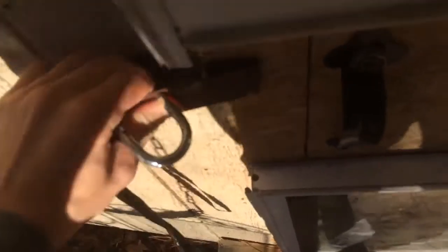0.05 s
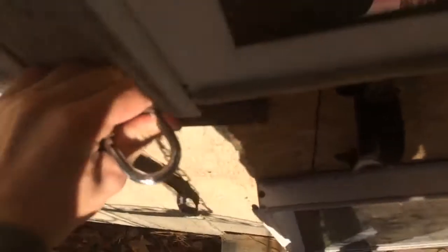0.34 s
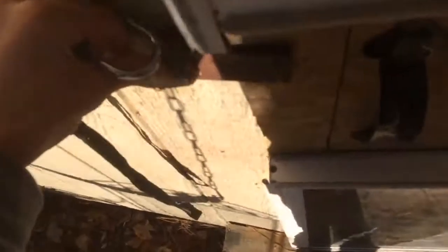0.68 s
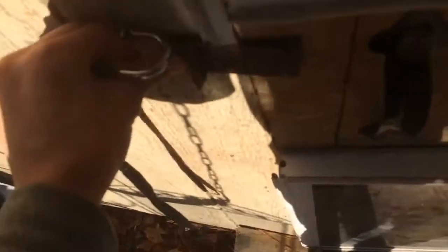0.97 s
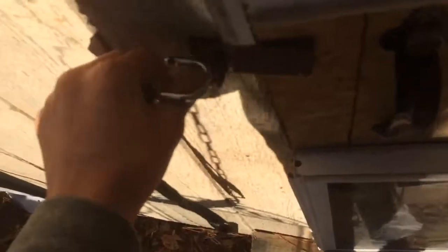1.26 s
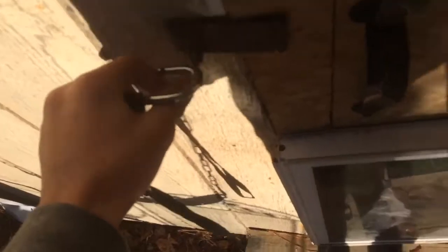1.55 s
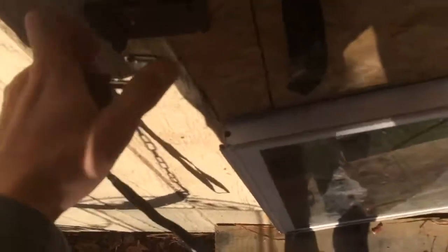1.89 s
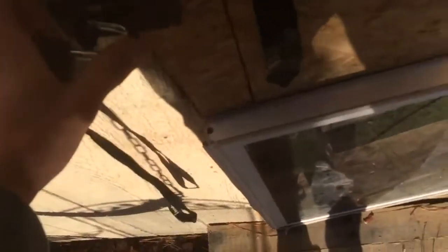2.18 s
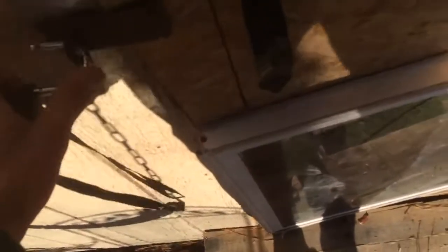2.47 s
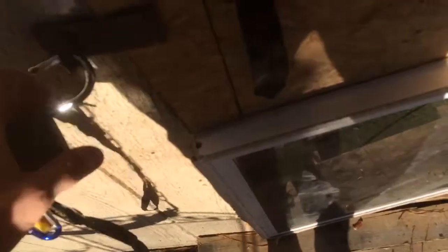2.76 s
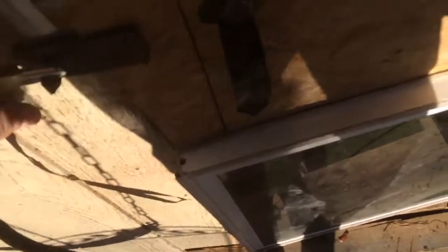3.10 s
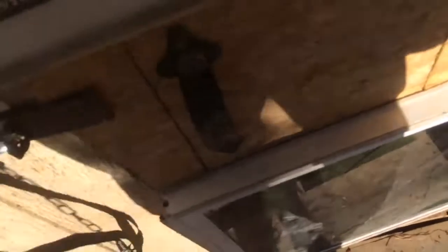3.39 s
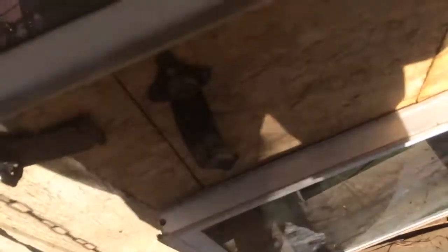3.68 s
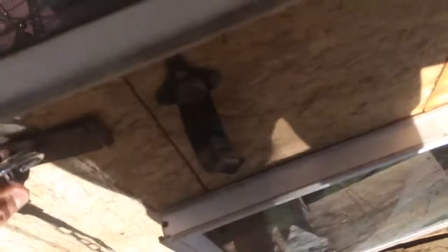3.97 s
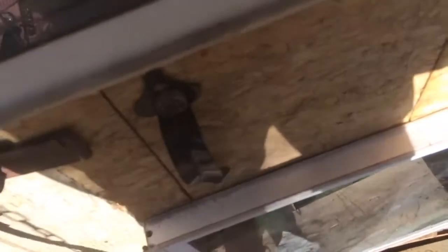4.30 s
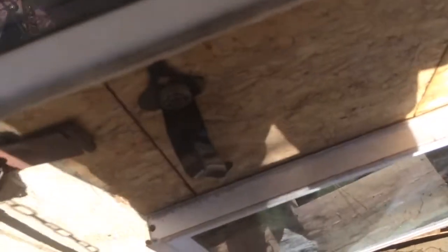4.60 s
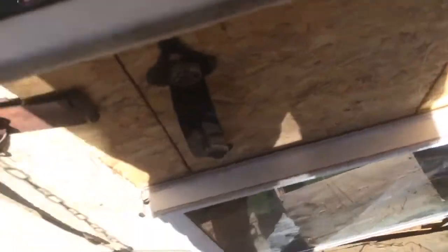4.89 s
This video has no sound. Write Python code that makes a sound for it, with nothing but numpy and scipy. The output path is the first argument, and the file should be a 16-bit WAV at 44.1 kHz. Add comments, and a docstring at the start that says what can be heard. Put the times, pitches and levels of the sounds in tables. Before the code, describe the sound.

A metal padlock scrapes, clacks and snaps shut on a wooden door's hasp, then keys jingle, with faint traffic outdoors.

```python
"""Outdoors at a wooden shed door, close by: a padlock with a bunch of keys in it is worked onto the hasp.
Far traffic hums, a machine whines and an insect trills faintly. The steel hasp scrapes in tiny slips
and knocks on the boards, which answer with a thud, and the shackle snaps home. As the keys are
turned and drawn out they swing, tick against each other and ring on.
A soft low handling bump and a rustle come at the end."""
import sys
import numpy as np
from scipy import signal
from scipy.fft import rfft, irfft
from scipy.io import wavfile

SR = 44100
rng = np.random.default_rng(int(sys.argv[2]) if len(sys.argv) > 2 else 0)


def bounce(signal):
    """Save signal as a 16-bit WAV file at the path given by the first command-line argument."""
    frames = np.transpose(np.atleast_2d(signal))
    limited = np.clip(frames, -1, 1)
    pcm = np.round(limited * 32767).astype(np.int16)
    wavfile.write(sys.argv[1], SR, pcm)


N = 222492
TIME = np.arange(N) / SR
HIT_TIME = TIME[:SR // 6]  # time axis of a one-shot

# Table levels are ahead of each layer's own gains.
# tone curves of the traffic's rumble and tyre noise: f/Hz, level/dB
RUMBLE_EQ = [(15, -39.5), (28, -28), (55, -4.5), (125, -5), (165, -7.5), (200, -12), (280, -17),
             (550, -28.5), (1200, -68), (4000, -73)]
TYRE_EQ = [(200, 0), (650, 0.5), (950, 4), (1500, 2), (2000, -5), (2600, -13.5), (4000, -25.5), (7000, -24),
           (15000, -28)]
# ebb and flow of traffic, which the tyre noise partly follows: t/s, level/dB
TRAFFIC_FLOW = [(0.0, -43.5), (0.46, -54), (2.06, -49), (2.28, -42), (3.64, -51.5), (5.05, -56)]
# tones of far engines: f/Hz, level/dB
ENGINE_TONES = [(86.1, -46.5), (328.4, -61), (737.5, -65), (888.2, -63), (1410, -74.5), (1642, -72)]
# fader ride of the insect: t/s, level/dB
INSECT_RIDE = [(0, -60), (2.0, -57.5), (3.7, -60), (4.4, -59.5), (4.9, -60.5)]
# modes of the door boards: f/Hz, level/dB, t60/s
DOOR_MODES = [(91.2, -4, 0.18), (138.6, 3, 0.14), (165.9, 1, 0.18), (220, -24, 0.033), (256.2, -6, 0.15),
              (321.7, -13.5, 0.11), (432.3, -7.5, 0.23), (680, -18.5, 0.0077)]
# resonances of lock and hasp, and of the keys: f/Hz, width/Hz, level/dB
LOCK_MODES = [(676, 12, 2.5), (1110, 20, -3), (1458, 200, -9), (1898, 25, -14), (2144, 13, -16),
              (3010, 87, -11.5), (5025, 220, -12.5), (5670, 62, -31), (6590, 40, -16), (7310, 53, -4),
              (7950, 20, -18), (9000, 170, 1), (11800, 49.3, -19.5), (11900, 70, -14)]
KEY_MODES = [(3290, 420, 16.5), (4300, 16, -3), (4780, 21, -2), (5630, 1070, 4.5), (6740, 780, 6),
             (8300, 23, 2), (9900, 65, 17.5), (10500, 1200, 0.5), (12200, 31, -7), (12140, 42, -3.5),
             (12100, 96, 1), (13500, 69, -10.5), (15500, 150, -9.5), (15700, 44, -13)]
# tone curve of sliding steel: f/Hz, level/dB
GRIT_EQ = [(150, -41), (380, 19.5), (520, -21), (700, -1), (1200, 5), (1900, 10), (3300, 1.5), (5000, -52),
           (9000, -39.5)]
# scrapes of steel, then a soft low handling bump and a rustle at the end:
# crest t/s, rise/s, fall/s, level/dB, relative rumble/dB, relative treble/dB
SCRAPE_AND_HANDLING_CUES = [(0.182, 0.018, 0.2, -35.5, 6.5, -3), (0.4, 0.0096, 0.44, -45.5, 11.5, -9),
                            (0.558, 0.059, .06, -29.5, 13.5, -7), (0.708, 0.0094, 0.021, -24, 11, -9),
                            (0.74, 0.082, 0.11, -45, 3, 4.5), (0.9, 0.095, 0.17, -33, 8.5, -11),
                            (1.079, 0.094, 0.065, -45.5, 9.5, 0), (1.209, 0.088, 0.19, -46.5, -1, -6),
                            (2.167, .004, 0.011, -39, -1, 5), (2.245, 0.02, 0.054, -39, 5, -19),
                            (2.32, 0.05, 0.12, -40, 4.5, -28), (2.483, 0.076, 0.062, -39, 9, -25),
                            (3.087, 0.024, .035, -30.5, -4.5, -15), (3.178, 0.099, .15, -53, 13, -9),
                            (3.296, 0.0085, 0.037, -35, 7, -3), (3.41, 0.0097, .26, -46.5, -15, -13),
                            (3.817, 0.055, 0.18, -40, 6, -28), (4.257, 0.1, 0.11, -38.5, 3.5, -15),
                            (4.795, .035, 0.055, -60, 25, -20), (5.021, 0.045, 0.049, -55, 17.5, -20)]
# swings of the bunch: crest t/s, level/dB
BUNCH_SWINGS = [(0.0, -47), (0.179, -36), (2.68, -54.5), (2.9, -52.5), (3.08, -49), (3.28, -36.5),
                (3.369, -44.5), (3.588, -54.5), (3.86, -45), (4.29, -54), (4.53, -51.5)]
# modes of the free-hanging keys: f/Hz, level/dB relative to the touch, t60/s
LOOSE_KEY_MODES = [(3360, -27, 0.051), (9450, -34.5, .11), (11820, -26, 0.065), (13550, -27, .11)]
# key touching key: t/s, level/dB, main resonance f/Hz
KEY_TOUCHES = [(0.012, -16, 6660), (0.3499, -26, 12100), (0.831, -18.5, 7060), (1.0705, -19, 4740),
               (2.2233, -40, 13500), (2.5415, -30, 13200), (2.674, -29, 4700), (2.7922, -24.5, 10200),
               (2.8822, -22.5, 9830), (2.9215, -21.5, 10700), (3.016, -14.5, 5640), (3.053, -19, 6530),
               (3.1066, -9.5, 10500), (3.217, -15.5, 5080), (3.223, -16.5, 6300), (3.251, -16.5, 4800),
               (3.265, -13, 6200), (3.2826, -15, 6500), (3.297, -11.5, 5560), (3.322, -16, 11600),
               (3.3725, -14, 13560), (3.416, -27, 7300), (3.547, -28, 13400), (3.5992, -22.5, 10300),
               (4.283, -16.5, 6800), (4.3004, -13, 11900), (4.348, -23, 13100), (4.4069, -26.5, 6300),
               (4.526, -35.5, 13700), (4.643, -29, 4280)]
# hasp, shackle or key left ringing by a hit: t/s, f/Hz, level/dB, t60/s
RING_OUTS = [(0.8842, 1980, -3, 0.026), (0.913, 6150, -29, 0.12), (1.315, 7950, -27.5, .11),
             (1.316, 6590, -30, 0.1), (2.174, 11480, -20, 0.035), (2.175, 14100, -29, .025),
             (2.482, 1110, -15.5, 0.05), (3.373, 13560, -41, 0.091), (3.82, 11930, -25, 0.028),
             (3.818, 1447, -30, .08), (4.301, 11900, -34, 0.077)]
# a steel edge snapping into place: t/s, level/dB
SNAP_CUES = [(0.442, -13.5), (0.594, -9.5), (0.938, -1.5), (1.948, -29), (2.3563, -4.5), (2.361, -18),
             (4.241, -17)]
# layers of a knock (thud, wood, clack, steel, edge): low f/Hz, high f/Hz, level/dB, t60/s
KNOCK_LAYERS = [(109, 333, -2, 0.13), (480, 1060, -6, 0.058), (1000, 3500, -9, 0.048),
                (3150, 7140, -2, 0.029), (7350, 12500, -5, 0.018)]
# knocks of lock and hasp: t/s, level/dB, then relative thud/dB, wood/dB, edge/dB; main resonance f/Hz
KNOCK_CUES = [(0.1723, -14.5, 2.5, -2.5, -23, 1110), (0.387, -31.5, 14, -2, -15, 980),
              (0.4423, -16.5, -10.5, -22, -36, 2940), (0.5001, -25, 9.5, -18, -12, 1070),
              (0.5231, -13, -0.5, -10, -8, 3800), (0.535, -23, -1, 7, -4, 1050),
              (0.554, -19, 10, 7, -15, 1000), (0.5636, -18, 8.5, -12, -3, 1110),
              (0.5782, -23.5, 6.5, -3, 1, 1110), (0.592, -9.5, -4.5, -2.5, -23, 1305),
              (0.7073, -3, -6, -14, -19, 1720), (0.7279, -10.5, -15.5, -3.5, -37, 1815),
              (0.7475, -18.5, -3, -19, -7, 1460), (0.835, -15.5, -1, -12, -37, 1000),
              (0.884, 1, -8.5, -17.5, -10, 2140), (0.9134, -12, -5, -31, -11, 1990),
              (0.9374, -6.5, -14, -44, -5, 1310), (0.9794, -20.5, 4, -24, -32, 1900),
              (1.093, -19.5, -30, -26, -19, 1880), (1.235, -22, -11, -9, -25, 1320),
              (1.3164, -4, -34, -20, -7.5, 2095), (1.3222, -5, -16, -23, -29, 2310),
              (1.9484, -33.5, -21, -30, -8, 1026), (2.169, -5, -12, -23, -11, 1370),
              (2.1758, -6, -21, -20, -15, 1240), (2.2425, -22.5, -13, -3.5, -38, 1380),
              (2.2914, -21.5, -5.5, -11, -23, 1340), (2.3298, -26, 3, 0.5, -22, 1260),
              (2.359, -15, -22, -33, -17.5, 3390), (2.4817, -1, -28, -18.5, -8.5, 1350),
              (2.4858, -9.5, -7, -5.5, -19, 1150), (2.9552, -18, -17.5, -32, -17, 1330),
              (3.181, -27, 0.5, -7.5, -5, 1420), (3.2911, -14.5, -12, -1, -10, 1147),
              (3.469, -23, -15.5, -28, -21, 2250), (3.8138, -15, -18.5, -9, -21, 1520),
              (3.8183, -7, -15.5, -22, -8.5, 1458), (4.241, -8, -16.5, -16, -18, 2596),
              (4.2811, -19.5, -2, -8, -12, 1860), (4.3009, -27, -19, 0, -8, 1050),
              (4.4404, -33, -4, -2, -30, 1440), (4.6369, -19.5, -2, -21, -17.5, 2320),
              (4.679, -27.5, 2.5, -22, -11, 1500)]


def from_db(db):
    """Decibels to gain."""
    return 10 ** (np.asarray(db) / 20)


def rms_one(x):
    """Scale to rms 1."""
    return x / np.sqrt(np.mean(x ** 2) + 1e-20)


def ride(points):
    """A breakpoint curve at every sample."""
    return np.interp(TIME, *np.transpose(points))


def add(out, t, sound):
    """Mix a sound in at t seconds."""
    at = max(round(t * SR), 0)
    out[at:at + len(sound)] += sound[:N - at]


def band(x, low_hz, high_hz, order=2):
    """Causal band-pass."""
    sos = signal.butter(order, [low_hz, high_hz], "band", fs=SR, output="sos")
    return signal.sosfilt(sos, x + 1e-18)


def coloured(x, curve):
    """Shape a long noise with a tone curve; rms 1."""
    hz, db = np.transpose(curve)
    log_hz = np.log(np.fft.rfftfreq(N, 1 / SR) + 1)
    gain = from_db(np.interp(log_hz, np.log(hz), db))
    return rms_one(irfft(rfft(x) * gain, N))


def drift(rate_hz):
    """Smooth random modulation of rms about 1."""
    hop, run_in = 40, 2000
    pole = np.exp(-2 * np.pi * hop * rate_hz / SR)
    noise = rng.standard_normal(N // hop + run_in + 2)
    slow = signal.lfilter([1], [1, -2 * pole, pole * pole], noise)[run_in:]
    return np.interp(np.arange(N) / hop, np.arange(len(slow)), rms_one(slow))


def sine(hz):
    """A tone that follows a pitch curve."""
    return np.sin(2 * np.pi * np.cumsum(hz) / SR)


def resonate(x, hz, width_hz):
    """One resonance with gain 1 at its peak."""
    r = np.exp(-np.pi * width_hz / SR)
    feedback = [1, -2 * r * np.cos(2 * np.pi * hz / SR), r * r]
    return signal.lfilter(np.array([1, 0, -1]) * (1 - r * r) / 2, feedback, x + 1e-18)


def body(x, modes, held_width_hz=45):
    """Play a sound through an object's resonances; the hand damps the narrowest."""
    return sum(from_db(db) * resonate(x, hz, max(width, held_width_hz)) for hz, width, db in modes)


def fade(t60):
    """Free decay from 1, down 60 dB after t60 seconds."""
    return np.exp(-np.log(1000) * HIT_TIME / t60)


def ring(hz, t60):
    """A struck mode."""
    return np.sin(2 * np.pi * hz * HIT_TIME) * fade(t60)


def partials(draws, low_hz, high_hz, t60):
    """Modes at random pitches in a range, each with its own strength and decay; starts near rms 1."""
    place, strength, life = draws
    pitches = low_hz * (high_hz / low_hz) ** place
    gains = (strength - .5) * np.sqrt(2 / np.sum((strength - .5) ** 2))
    return sum(gain * ring(hz, decay) for hz, gain, decay in zip(pitches, gains, t60 * (.5 + life)))


def burst(noise, low_hz, high_hz, t60):
    """Many close modes struck at once, dying together; starts near rms 1."""
    sound = band(noise * fade(t60), low_hz, high_hz, order=3)
    return sound * np.sqrt(np.sum(fade(t60) ** 2) / np.sum(sound ** 2))


def grains(per_s, spread_db=5):
    """Random tiny impacts of uneven size."""
    out = np.zeros(N)
    onsets = np.flatnonzero(rng.random(N) < per_s / SR)
    size, sign = rng.random((2, N))[:, onsets]
    size_db = spread_db * np.minimum(-np.log(1 - size), 3.5)
    out[onsets] = from_db(size_db) * np.sign(sign - .5)
    return out


def traffic(rumble_db=-41, tyres_db=-49, tyres_follow=0.387, hum_db=-1):
    """The far traffic bed: rumble, tyre wash and wavering engine tones."""
    flow_db = ride(TRAFFIC_FLOW)
    swell_db = tyres_follow * (flow_db - flow_db.mean())
    rumble = from_db(rumble_db + drift(1.45)) * coloured(rng.standard_normal(N), RUMBLE_EQ)
    tyres = from_db(tyres_db + swell_db) * coloured(rng.standard_normal(N), TYRE_EQ)
    hum = sum(from_db(db + 3 * drift(3.4)) * sine(hz + 1.5 * drift(8)) for hz, db in ENGINE_TONES)
    return rumble + tyres + from_db(hum_db) * np.sqrt(2) * hum


def machine(hz=1397, waver_hz=22, level_db=-55, fade_in_s=1.3):
    """A distant machine's unsteady whine fades up at the start."""
    level = from_db(level_db + 3 * drift(13)) * np.minimum(TIME / fade_in_s, 1)
    return level * sine(hz + waver_hz * drift(17.9))


def insect(strokes_per_s=50.8, duty=.5, top_hz=5450, sag_hz=550, scatter_db=-5):
    """Each wing stroke is a short tone that sags in pitch; the foliage smears it into a soft hiss."""
    cycles = np.cumsum(strokes_per_s + 0.35 * drift(5.6)) / SR
    stroke = np.minimum(cycles % 1 / duty, 1)
    tone = np.sin(np.pi * stroke) * sine(top_hz - sag_hz * stroke ** 2 + 70 * drift(191))
    hiss = np.std(tone) * rms_one(band(rng.standard_normal(N), top_hz - sag_hz, top_hz))
    return from_db(ride(INSECT_RIDE) + 1.5 * drift(22)) * (tone + from_db(scatter_db) * hiss)


def shed_reflections(x, t60=0.13, predelay_s=.006, wet_db=-17, top_hz=3500):
    """The wall, eaves and ground scatter back a short dull tail."""
    scatter = rng.standard_normal(len(HIT_TIME)) * fade(t60) * (HIT_TIME > predelay_s)
    tail = band(scatter, 100, top_hz, order=1)
    tail /= np.sqrt(np.sum(tail ** 2) * SR / 2 / top_hz)  # about unity gain in the band
    return x + from_db(wet_db) * signal.fftconvolve(x, tail)[:N]


def scrapes_and_handling(rough_db=4.5, lock_db=5, burr_db=-11.5, shake_db=-15,
                         skid_db=-36, skid_t60=0.054):
    """Steel slips, catches on burrs and shakes the door; a soft handling bump and a rustle come last."""
    slips = grains(per_s=1100, spread_db=3.5) * from_db(rough_db * drift(68))
    grit = coloured(slips + from_db(lock_db) * body(slips, LOCK_MODES), GRIT_EQ)
    sizzle = rms_one(band(slips + body(slips, KEY_MODES), 2800, 9500, order=1))
    burrs = rms_one(band(grains(per_s=110), 2000, 10000, order=1))
    treble = sizzle + from_db(burr_db) * burrs
    boards = [(hz, np.log(1000) / np.pi / t60, db) for hz, db, t60 in DOOR_MODES]  # t60 to width
    shake = rng.standard_normal(N)
    rumble = rms_one(body(shake, boards) + from_db(shake_db) * band(shake, 55, 240))
    skids = np.zeros(N)
    for t, db, *_ in KNOCK_CUES:  # the steel skids on briefly after every knock
        add(skids, t, from_db(db + skid_db) * fade(skid_t60))
    out = skids * grit
    for crest, rise, fall, db, rumble_db, treble_db in SCRAPE_AND_HANDLING_CUES:
        start, end = crest - rise, crest + fall
        span = slice(int(start * SR), int(end * SR))
        pressure = np.interp(TIME[span], [start, crest, end], [0, 1, 0]) ** 1.65
        texture = grit[span] + from_db(rumble_db) * rumble[span] + from_db(treble_db) * treble[span]
        out[span] += pressure * from_db(db) * texture
    return out


def jingle(level_db=-2, width_hz=55, tick_db=-6, count=24, rise_db_per_s=330, fall_db_per_s=181):
    """Each swing of the bunch is a swell of small touches, each ringing one of the keys' partials."""
    pitches = np.linspace(3500, 15300, count) + rng.uniform(-200, 200, count)
    touches = grains(per_s=1500)
    struck = rng.integers(0, count, N)
    rings = rms_one(sum(resonate(touches * (struck == k), hz, width_hz) for k, hz in enumerate(pitches)))
    ticks = rms_one(band(touches, 1800, 7700))
    swings_db = [db - np.maximum(rise_db_per_s * (t - TIME), fall_db_per_s * (TIME - t))
                 for t, db in BUNCH_SWINGS]
    return from_db(np.max(swings_db, axis=0) + level_db) * (rings + from_db(tick_db) * ticks)


def loose_keys():
    """Every touch sets the free-hanging keys ringing, each with a strength of its own."""
    out = np.zeros(N)
    modes = np.array([from_db(db) * ring(hz, t60) for hz, db, t60 in LOOSE_KEY_MODES])
    shares = rng.uniform(-1, 1, (len(KEY_TOUCHES), len(LOOSE_KEY_MODES)))
    for (t, db, _), share in zip(KEY_TOUCHES, shares):
        add(out, t, from_db(db) * (share @ modes))
    return out


def key_clinks(tick_t60=0.0049, ring_t60=.034, ring_db=-10, body_db=-14.5, shimmer_db=-11,
               main_db=-19, main_t60=0.038, rebound_s=0.0065, rebound_db=-6.5, direct_db=-2, bunch_db=-8):
    """Key meets key: a sharp tick, a brief ring around one main mode, and a single rebound."""
    out = np.zeros(N)
    noises = rng.standard_normal((len(KEY_TOUCHES), 2, len(HIT_TIME)))
    draws = rng.random((len(KEY_TOUCHES), 2, 3, 10))  # two sets of ten partials a touch
    delays = rebound_s * rng.uniform(.5, 1.5, len(KEY_TOUCHES))
    for (t, db, hz), noise, (lower, upper), delay in zip(KEY_TOUCHES, noises, draws, delays):
        bending = burst(noise[0], 3930, 8100, tick_t60)
        bending += from_db(ring_db) * partials(lower, 3634, 8000, ring_t60)
        shimmer = burst(noise[1], 6000, 15500, tick_t60)
        shimmer += from_db(ring_db) * partials(upper, 8000, 15000, ring_t60)
        tilt_db = np.log2(hz / 8000)  # per octave of the main mode: 1 dB more body, 1 dB less shimmer
        clink = from_db(body_db + tilt_db) * bending + from_db(shimmer_db - tilt_db) * shimmer
        add(out, t, from_db(db) * (clink + from_db(main_db) * ring(hz, main_t60)))
        add(out, t + delay, from_db(db + rebound_db) * clink)
    return from_db(direct_db) * out + from_db(bunch_db) * body(out, KEY_MODES)


def pings(twin_db=-6, detune_hz=70):
    """Parts that the hand does not damp ring on, with a close twin mode that beats."""
    out = np.zeros(N)
    for t, hz, db, t60 in RING_OUTS:
        twin = ring(hz + detune_hz * rng.standard_normal(), t60 / 2)
        add(out, t, from_db(db) * (ring(hz, t60) + from_db(twin_db) * twin))
    return out


def snaps(band_hz=(2700, 4500), crack_t60=0.0015, tail_db=-17, tail_t60=0.02):
    """A steel edge slips into place: a tight, bright crack with a faint tail."""
    out = np.zeros(N)
    for t, db in SNAP_CUES:
        crack = burst(rng.standard_normal(len(HIT_TIME)), *band_hz, crack_t60)
        tail = burst(rng.standard_normal(len(HIT_TIME)), *band_hz, tail_t60)
        add(out, t, from_db(db) * (crack + from_db(tail_db) * tail))
    return out


def knocks(main_db=-10, cluster_db=-15, cluster_ratio=1.093, overtone_db=-6, door_db=-8, direct_db=-3):
    """Steel meets steel: a short clack coloured by the lock, and a thud from the boards behind."""
    steel, door = np.zeros(N), np.zeros(N)
    count = len(KNOCK_CUES)
    noises = rng.standard_normal((count, len(KNOCK_LAYERS), len(HIT_TIME)))
    shares = rng.uniform(.5, 1.4, (count, len(DOOR_MODES)))  # each blow weights the door's modes anew
    shares *= rng.choice([-1, 1], shares.shape)
    draws = rng.random((count, 2, 3, 8))  # two sets of eight partials a knock
    boards = np.array([from_db(db) * ring(hz, t60) for hz, db, t60 in DOOR_MODES])
    for cue, noise, share, (near, upper) in zip(KNOCK_CUES, noises, shares, draws):
        t, db, thud_db, wood_db, edge_db, hz = cue
        steel_db = -6.5 + 0.38 * edge_db  # the steel layer follows the bright edge
        layers = zip(noise, (thud_db, wood_db, 0, steel_db, edge_db), KNOCK_LAYERS)
        clack = sum(from_db(trim_db + layer_db) * burst(source, low, high, t60)
                    for source, trim_db, (low, high, layer_db, t60) in layers)
        # the grip and the point of contact pick a main resonance, its neighbours and a few overtones
        clack += from_db(main_db) * ring(hz, t60=0.04)
        clack += from_db(cluster_db) * partials(near, hz / cluster_ratio, hz * cluster_ratio, t60=0.02)
        clack += from_db(steel_db + overtone_db) * partials(upper, 2976, 8550, t60=.022)
        add(steel, t, from_db(db) * clack)
        add(door, t, from_db(db + thud_db + door_db) * (share @ boards))
    return from_db(direct_db) * steel + body(steel, LOCK_MODES) + door


def scene():
    """The mono mix: lock and keys at arm's length, the outdoor bed behind."""
    foley = shed_reflections(knocks() + snaps() + key_clinks() + jingle() + scrapes_and_handling())
    return (foley + pings() + loose_keys() + traffic() + machine() + insect())[None]


def record(dry, cutoff_hz=16100):
    """Peaks clip at full scale, then a steep low-pass takes off the very top."""
    low_pass = signal.ellip(10, .1, 70, cutoff_hz, fs=SR, output="sos")
    return signal.sosfilt(low_pass, np.clip(dry, -1, 1))


dry = scene()
out = record(dry)
bounce(out)
```